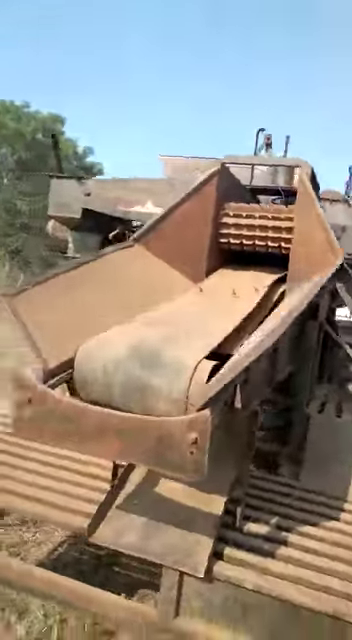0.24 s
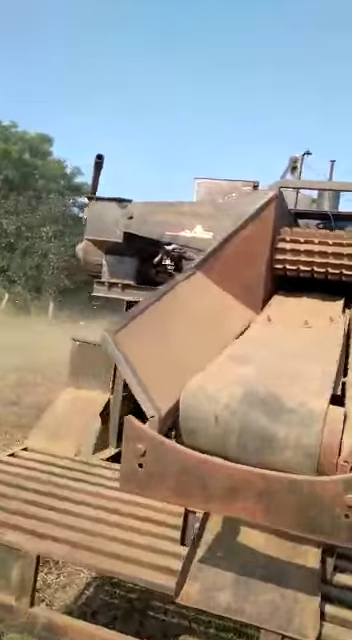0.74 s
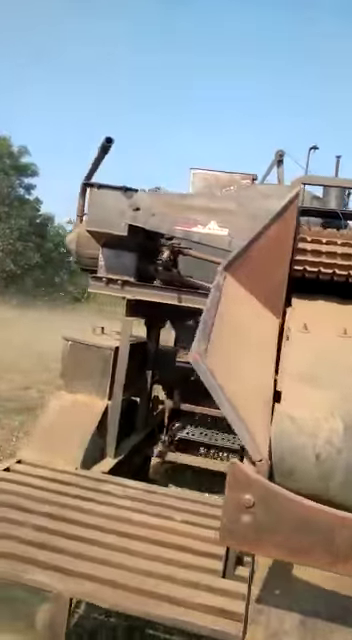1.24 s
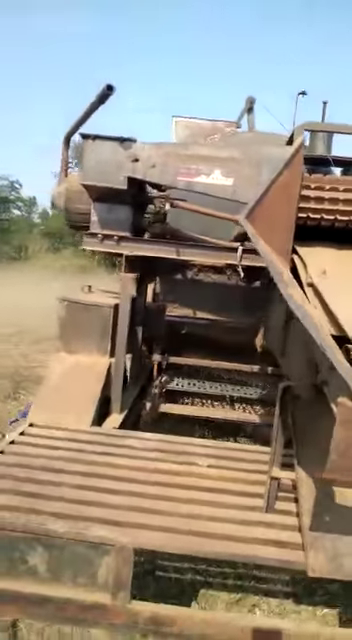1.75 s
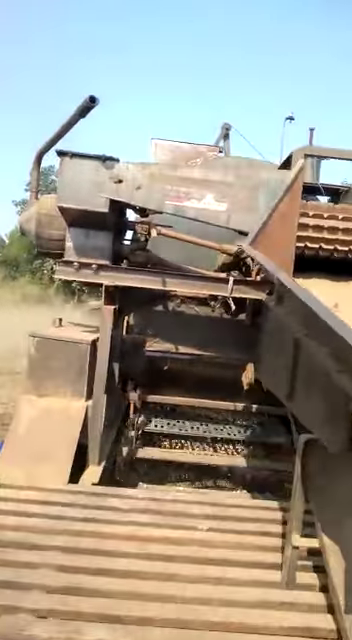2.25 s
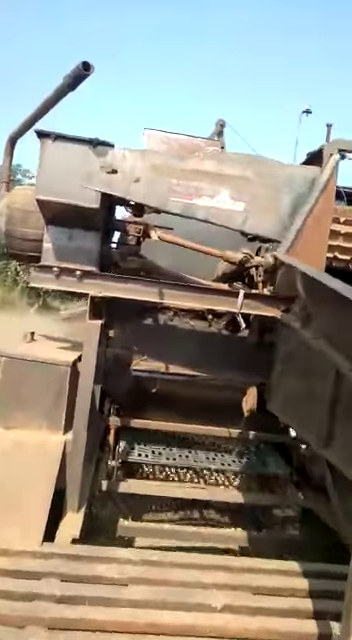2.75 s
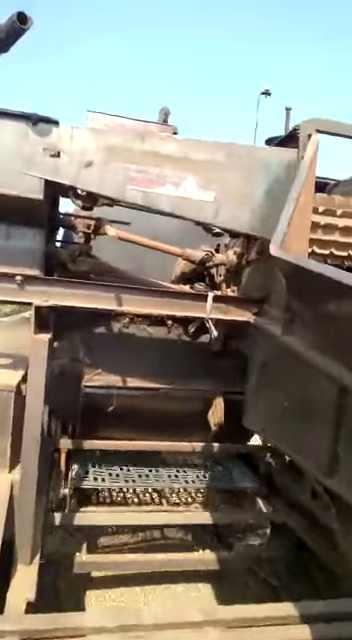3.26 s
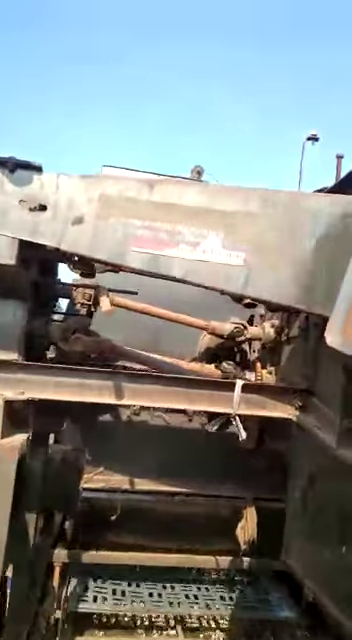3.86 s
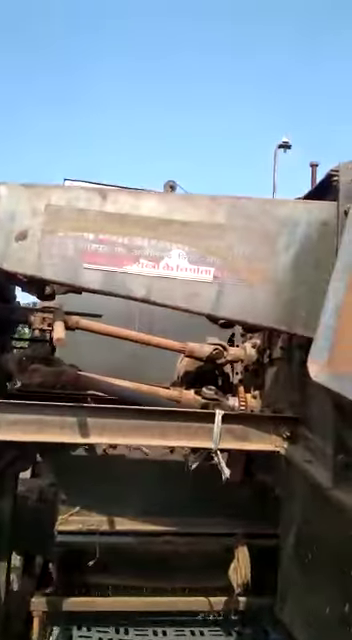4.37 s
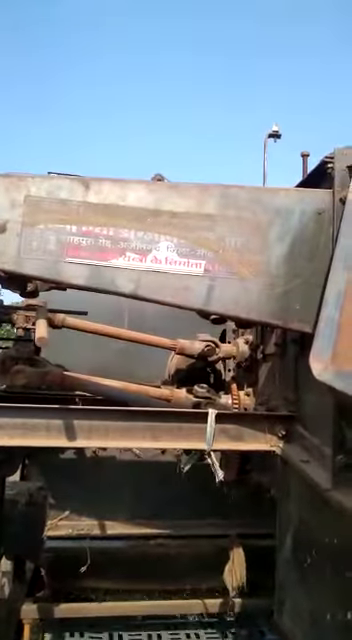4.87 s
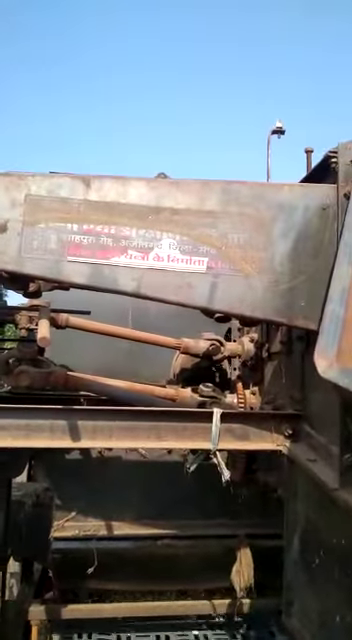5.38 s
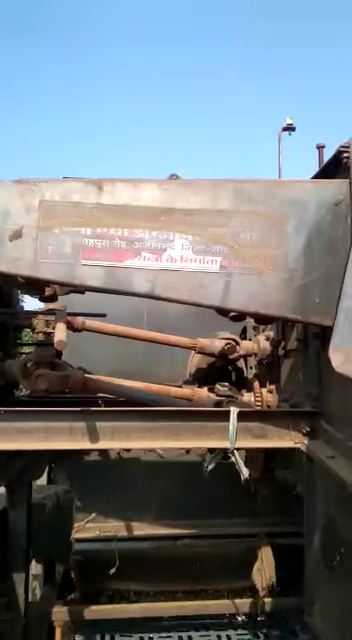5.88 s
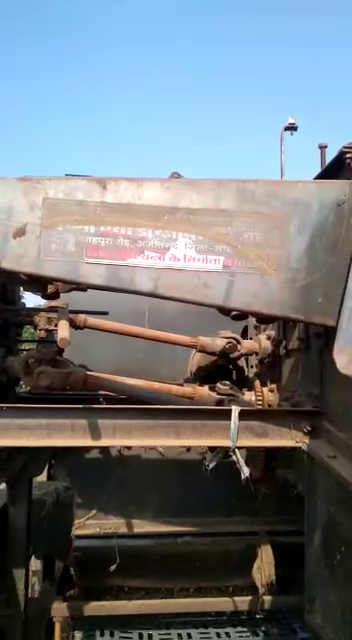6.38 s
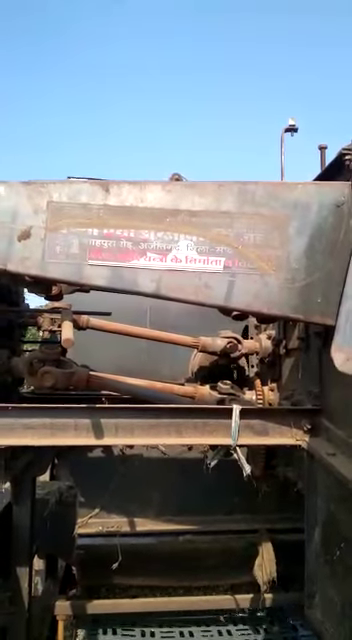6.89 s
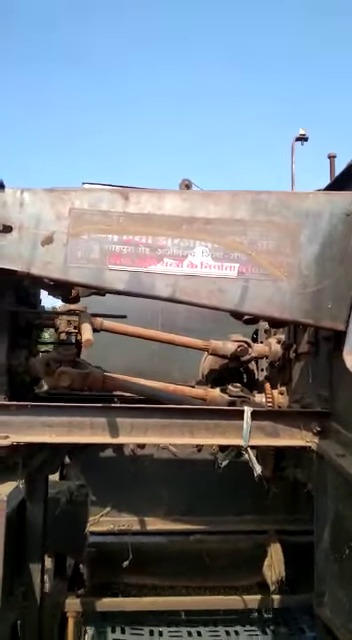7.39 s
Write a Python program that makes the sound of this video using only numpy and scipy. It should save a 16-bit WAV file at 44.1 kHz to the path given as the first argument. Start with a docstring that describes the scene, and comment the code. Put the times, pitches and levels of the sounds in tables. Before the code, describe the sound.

Up close to a running groundnut thresher: heavy low drone, buzzing sheet steel, harsh fluttering hiss and dull knocks growing denser as we approach.

```python
"""In an open field a tractor-driven groundnut thresher runs at full speed as the microphone walks up to it.
The blower is a bladed pulse near 52 a second with housing overtones, duct rumble and steady shaft hums.
Shaped noise makes the drum's roar and torn haulm; dying scrapes of noise are the pods on the shaking sieves.
Damped bands of noise knock in the drum casing. The throb overloads both channels: it turns squarish
and chops the hiss twice in every cycle."""
import sys
import numpy as np
from scipy import signal
from scipy.fft import rfft, irfft, next_fast_len
from scipy.io import wavfile
from scipy.ndimage import uniform_filter1d, minimum_filter1d, map_coordinates

SR = 44100
rng = np.random.default_rng(int(sys.argv[2]) if len(sys.argv) > 2 else 0)


def int16_out(signal):
    """Quantize to a 16-bit WAV file."""
    q = np.round(np.clip(np.atleast_2d(signal).T, -1, 1) * 32767)
    wavfile.write(sys.argv[1], SR, q.astype(np.int16))


N = 336483


def amp(db):
    """Decibels to gain."""
    return 10 ** (np.asarray(db) / 20)


def unit(x):
    """Scale to rms 1."""
    return x / np.sqrt(np.mean(x ** 2) + 1e-20)


def along(points, hz):
    """Read (f/Hz, value) points on a log frequency axis."""
    f, value = np.transpose(points)
    return np.interp(np.log(hz + 1), np.log(f + 1), value)


def curves(rows):
    """One value per sample for each column after t/s."""
    s, *columns = np.transpose(rows)
    return [np.interp(np.arange(N) / SR, s, column) for column in columns]


def wobble(rate):
    """A smooth random curve with this many knots a second."""
    knots = rng.standard_normal(int(N * rate / SR) + 4)
    return map_coordinates(knots, [np.arange(N) * rate / SR])


def angle(hz):
    """Running phase of a rotation, in radians."""
    return 2 * np.pi * np.cumsum(hz) / SR


def filtered(x, response):
    """Shape x with a complex response of frequency."""
    m = next_fast_len(N + SR // 2)
    return irfft(rfft(x, m) * response(np.fft.rfftfreq(m, 1 / SR)), m)[..., :N]


# how alike left and right are in the noise layers: (f/Hz, likeness from 0 to 1)
LIKENESS = [(60, 0.84), (300, 0.71), (700, 0.43), (1500, 0), (10000, 0)]


def rush(spectrum, patchy_db):
    """Stereo noise of rms 1, its gain patchy over time and frequency."""
    z = signal.stft(rng.standard_normal((2, N)), nperseg=512)[2]
    patches = uniform_filter1d(rng.standard_normal(z.shape[1:]), size=8, axis=0)
    patches = uniform_filter1d(patches, size=10, axis=1)
    pair = signal.istft(z * amp(patchy_db * unit(patches)), nperseg=512)[1][:, :N]

    def response(hz):
        turn = np.arccos(np.clip(along(LIKENESS, hz), -1, 1)) / 2  # more likeness, less side
        return amp(along(spectrum, hz)) * [np.cos(turn), np.sin(turn)]

    mid, side = filtered(pair, response)
    return unit(np.array([mid + side, mid - side]))


# rate of the blower's blade passes: (t/s, f/Hz)
BLADE_RATE = [(0, 51.84), (1.6, 51.87), (2.7, 51.93), (3.8, 52.08), (5, 52.04), (6.1, 51.99), (7.63, 52.08)]
# the walk up to the machine: (t/s, approach level/dB that each layer scales, housing drone level/dB)
APPROACH = [(0, -1, -39), (1.2, -0.56, -17), (2.1, -1, -10), (2.5, 0.1, -5.5), (3.2, 0.5, -1.5),
            (4.3, 1.5, 4), (4.9, 1.4, 5.5), (5.4, 1.8, 4), (6.2, 1.24, 2.5), (7.63, 1.7, 3.3)]


def blower(left_db=5.0, right_db=-0.03, left_gain=0.37, right_gain=1.48, octave_db=-16.0, lean=0.14,
           right_cut_hz=32, flutter_db=0.25, sway=0.016):
    """Each blade sends out a smooth pressure pulse and shakes the housing."""
    rate_hz, = curves(BLADE_RATE)
    near_db, _ = curves(APPROACH)
    turn = angle(rate_hz) + sway * wobble(14)
    # narrow crest, wide trough, slightly lopsided
    pulse = np.cos(turn) + amp(octave_db) * np.cos(2 * turn + lean)
    throb = pulse * amp(flutter_db * wobble(23))
    panels = housing(turn)
    left = throb * amp(left_db + left_gain * near_db) + panels[0]
    # the right port gains more from the approach and passes less deep bass
    right = throb * amp(right_db + right_gain * near_db) + panels[1]
    return np.array([left, filtered(right, lambda hz: 1j * hz / (1j * hz + right_cut_hz))])


# overtones of the sheet-steel housing, before its drone level:
# (multiple of the blade rate, left level/dB, right level/dB)
HOUSING_OVERTONES = [(3, -28.5, -21), (4, -23.5, -25), (5, -23.5, -21.5), (6, -28.5, -37), (7, -33.5, -30),
                     (8, -53, -50), (10, -36.5, -42.5)]


def housing(turn, late=0.808, swell_db=1.1, rattle_db=0.9, jitter=0.12):
    """Loose sheet-steel panels answer late, a fraction of a blade cycle; every overtone rattles unevenly."""
    _, housing_db = curves(APPROACH)
    phase = turn - 2 * np.pi * late
    panels = 0
    for multiple, left_db, right_db in HOUSING_OVERTONES:
        level = amp([[left_db], [right_db]]) * amp(rattle_db * wobble(18))
        panels = panels + level * np.cos(round(multiple) * phase + jitter * wobble(18))
    return panels * amp(housing_db + swell_db * wobble(3.9))


# tone of the air in the blower duct: (f/Hz, relative level/dB per Hz)
DUCT_TONE = [(12, 4), (32, 5), (65, 8.5), (110, 2.5), (250, 2.5), (400, -3), (600, -14.5), (1200, -41)]


def duct(base_db=-24, left_db=3, right_db=4.0):
    """The blower's draught rumbles evenly, whatever the crop does, and grows with the approach."""
    near_db, _ = curves(APPROACH)
    return amp(base_db + near_db) * rush(DUCT_TONE, patchy_db=0.5) * amp([[left_db], [right_db]])


# hum of the engine and the belt-driven shafts: (mean f/Hz, left level/dB, right level/dB)
SHAFT_HUMS = [(31, -31, -38), (33.2, -34, -41), (39, -30, -39), (42, -27, -37), (62, -38, -31),
              (133.1, -20.5, -25)]


def tractor():
    """The engine and the shafts hum, geared to the same drive as the blower."""
    rate_hz, = curves(BLADE_RATE)
    drive = rate_hz / rate_hz.mean()
    return sum(np.cos(angle(hz * drive)) * amp([[left_db], [right_db]])
               for hz, left_db, right_db in SHAFT_HUMS)


# roar of the drum air as the microphone moves round the hopper, before the approach gain: (t/s, level/dB)
ROAR_LEVEL = [(0, -21.5), (.6, -24), (1.3, -23.5), (2.2, -23), (3, -21), (4.2, -21.5), (4.9, -20.5),
              (5.7, -20.5), (6.4, -20), (7.63, -20)]
# air whirled round in the drum, with the hollow note of its casing: (f/Hz, relative level/dB per Hz)
ROAR_TONE = [(150, -16), (480, -5.5), (750, -0.2), (1050, -2.5), (1250, -2.5), (1480, -1.5), (1850, -3.5),
             (2300, -5), (4000, -12), (9000, -21.5), (16000, -45)]
# shredded straw and chaff: (f/Hz, relative level/dB per Hz)
STRAW_TONE = [(300, -8), (1200, -1.5), (2300, 2), (3800, 1.5), (5500, -2), (7500, -3), (9000, -1),
              (10000, -5.5), (11500, -9.5), (15500, -14)]
# chaff sifting, brightest as the sieve opening comes round, before surge and approach: (t/s, level/dB)
CHAFF_LEVEL = [(0, -34.5), (1.2, -36), (1.65, -30), (2.5, -29.5), (3.5, -30), (7.63, -60)]
# fine chaff on the sieves: (f/Hz, relative level/dB per Hz)
CHAFF_TONE = [(1500, -20), (4000, -7.5), (7200, 3), (8800, -14), (11000, -5.5), (15000, -13)]


def drum(straw_db, shake, hiss_db=3.5, shake_db=-0.18, tear_db=0.85, draught_db=0.56):
    """Air roars through the drum; straw hisses and flickers as it tears; chaff sifts behind the opening."""
    roar_db = curves(ROAR_LEVEL)[0] + draught_db * wobble(2.6)
    chaff_db, = curves(CHAFF_LEVEL)
    surge_db = tear_db * wobble(95) + shake_db * shake
    roar = amp(roar_db) * rush(ROAR_TONE, patchy_db=0.5)
    straw = amp(straw_db + hiss_db) * rush(STRAW_TONE, patchy_db=1)
    chaff = amp(chaff_db) * rush(CHAFF_TONE, patchy_db=2.5)
    return roar + (straw + chaff) * amp(surge_db)


# resonances of the steel sieves and chute: (f/Hz, width f/Hz, relative level/dB)
SIEVE_MODES = [(720, 280, -10), (1590, 180, 8.5), (2200, 230, 7.5), (3700, 1900, 0), (7000, 7400, -6)]


def pods(pod_db, shake, per_second=2200, level_db=-8.5, spread_db=3.5, bunching=0.23, t60=0.023):
    """Pods and grit strike the sieves as short dying scrapes, densest at one end of each stroke."""
    struck = rng.random(N) < per_second / SR * (1 + bunching * shake)
    blows = struck * amp(spread_db * np.clip(rng.standard_normal((2, N)), -2, 2))
    t = np.arange(SR // 25) / SR
    decay = amp(-60 * t / t60)
    power = signal.fftconvolve(blows ** 2, decay[None] ** 2, axes=1)[:, :N]
    scrapes = np.sqrt(np.abs(power)) * rng.standard_normal((2, N))

    def response(f):
        steel = sum((-1) ** k * amp(db) * 1j * f * width / (centre * centre - f * f + 1j * f * width)
                    for k, (centre, width, db) in enumerate(SIEVE_MODES))
        return steel / (1 + (f / 9000) ** 8)  # the husks are soft: dull above 9 kHz

    return amp(pod_db + level_db) * unit(filtered(scrapes, response))


# clods, roots and clumps of pods knocking round the drum casing, before the approach gain:
# (t/s, level/dB, f/Hz of the panel struck)
CASING_KNOCKS = [(.2, -31, 1469), (.833, -26, 796), (1.092, -30, 1354), (1.669, -29, 1198),
                 (1.773, -24, 676), (1.95, -23, 1594), (2.751, -25, 734), (2.78, -23, 2710),
                 (2.928, -24, 676), (2.975, -26, 1150), (3.025, -25, 1530), (3.291, -26, 1248),
                 (3.335, -26, 1802), (3.605, -21, 2302), (3.668, -24, 649), (3.706, -21, 2200),
                 (3.813, -23, 830), (4.263, -24, 1469), (4.519, -23, 704), (4.623, -23, 830),
                 (4.731, -20, 649), (4.853, -22, 796), (4.9, -24, 1060), (5.123, -24.5, 796),
                 (5.265, -21, 977), (6.199, -19, 820), (6.42, -23, 623), (6.681, -24, 1955),
                 (6.728, -22.5, 4077), (7.201, -27, 1594), (7.273, -25, 2302)]


def knocks(width=0.25, rise_s=0.0055, t60=0.19):
    """Each clump crumbles against a panel: a quick rise, then a dull ring that the crop damps."""
    t = np.arange(SR // 4) / SR
    hz = np.fft.rfftfreq(len(t), 1 / SR)
    shape = (1 - np.exp(-t / rise_s)) * amp(-60 * t / t60)
    shape_rms = np.sqrt(np.mean(shape ** 2)) / shape.max()
    out = np.zeros((2, N + len(t)))
    for s, db, pitch_hz in CASING_KNOCKS:
        panel = 1 / (1 + ((hz - pitch_hz) / (width * pitch_hz / 2)) ** 2)
        ring = irfft(rfft(rng.standard_normal((2, len(t)))) * panel, len(t)) * shape
        start = round(s * SR)
        out[:, start:start + len(t)] += amp(db) * unit(ring) * shape_rms
    return out[:, :N]


# handfuls of haulm pulled through the drum:
# (peak t/s, length t/s at half the rise, straw hiss rise level/dB, pod rattle rise level/dB)
HAULM_HANDFULS = [(1.10, 0.044, 1, 10), (1.96, .11, 2.2, 6), (2.79, 0.11, 2.5, 9), (2.972, 0.1, 3, 9),
                  (3.34, 0.085, 0, 5), (3.622, .09, 0.5, 10), (3.76, .17, -1, 5.5), (4.25, 0.1, 1.5, 2),
                  (4.52, 0.095, 0.5, 5), (4.634, 0.09, 1.2, 4), (4.82, 0.1, .7, 2.5), (4.91, 0.2, .7, 1.5),
                  (5.134, 0.051, 3, 4.5), (5.275, 0.13, .6, 5), (5.59, .1, 0.5, 8), (5.787, 0.14, .8, 4),
                  (6.155, 0.061, 1.5, 4), (6.27, 0.076, .7, 4.5), (6.514, .14, 1.2, 3),
                  (6.73, 0.07, 1.5, 5), (7.237, .16, 0, 5)]


def handfuls():
    """Each handful swells and fades smoothly: dB added to the straw and to the pods."""
    t = np.arange(N) / SR
    return sum(np.outer([straw_db, pod_db], .5 ** ((2 * (t - s) / length) ** 2))
               for s, length, straw_db, pod_db in HAULM_HANDFULS)


# crop passing through the drum, before drift, handfuls and layer gains: (t/s, level/dB)
CROP_FEED = [(0, -30.5), (.6, -32.3), (1.22, -32.5), (1.75, -27.5), (2.2, -28), (2.7, -27.5), (3.5, -24),
             (4.1, -24.5), (4.8, -23), (5.02, -24), (5.3, -23.5), (5.48, -24), (5.6, -22), (6.72, -22.5),
             (6.88, -23.6), (7.1, -21.5), (7.63, -22)]


def scene(left_db=4.0, right_db=0.73, approach=0.55, sieve_approach=0.67):
    """The whole machine as it reaches the two ports; one flow of crop drives the drum and the sieves."""
    near_db, _ = curves(APPROACH)
    feed_db, = curves(CROP_FEED)
    flow_db = feed_db + 0.47 * wobble(37)  # the flow is never quite even
    straw_db, pod_db = flow_db + handfuls()
    shake = np.sin(angle(6.8 + 0.42 * wobble(1.9)))  # the stroke of the sieves
    # the sieves lie nearest: their rattle gains extra dB from the approach
    rattle = pods(pod_db + sieve_approach * near_db, shake)
    crop = (drum(straw_db, shake) + rattle + knocks()) * amp(approach * near_db)
    return blower() + duct() + tractor() + crop * amp([[left_db], [right_db]])


def limiter(x, ceiling=0.95, hold_s=0.47):
    """Turns both channels down together to keep the peaks under the ceiling."""
    needed = np.minimum(1, ceiling / (np.abs(x).max(axis=0) + 1e-9))
    width = int(hold_s * SR)
    return x * uniform_filter1d(minimum_filter1d(needed, width), width)


# colour of the left port against the right, used from 150 Hz up: (f/Hz, level/dB)
PORT_COLOUR = [(52, 15), (160, 5.5), (300, 2), (700, 0), (1300, 2), (2200, 1), (4000, -2.5), (5500, -1.5),
               (7500, 3.5), (9200, 6), (11000, -2), (15000, 2)]


def record(dry, top=0.91, hardness=9, leak=.125, treble_db=-7, top_hz=15900):
    """The input saturates on every throb; then come the channels' colour, a limiter and the band limit."""
    clipped = dry / (1 + np.abs(dry / top) ** hardness) ** (1 / hardness)
    held = clipped + leak * (dry - clipped)  # the flat tops keep a trace of the signal

    def colour(hz):
        treble = along([(9300, 0.032), (11500, treble_db)], hz)
        balance = np.where(hz < 150, 0, along(PORT_COLOUR, hz))
        return amp(treble + np.array([[.5], [-.5]]) * balance)  # half to each side

    return filtered(limiter(filtered(held, colour)), lambda hz: hz < top_hz)


dry = scene()
out = record(dry)
int16_out(out)
```